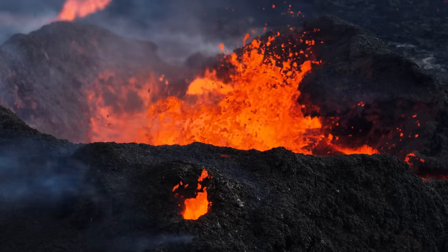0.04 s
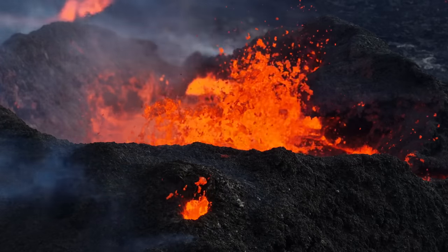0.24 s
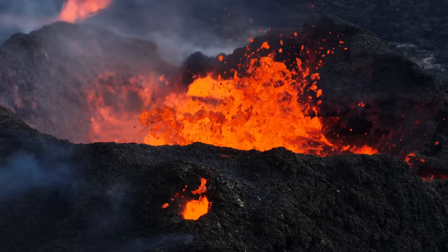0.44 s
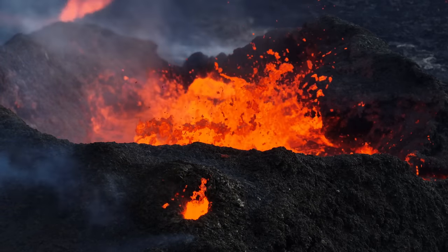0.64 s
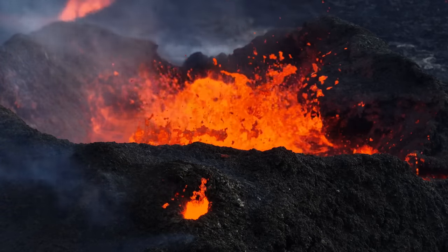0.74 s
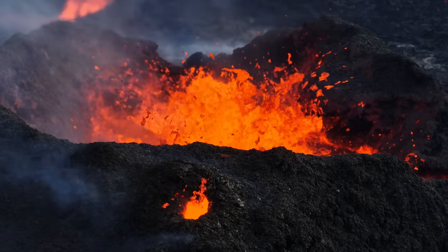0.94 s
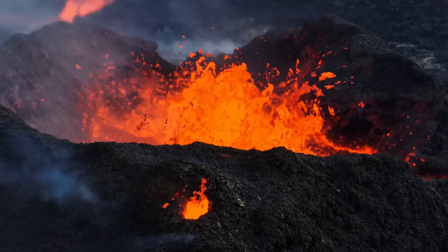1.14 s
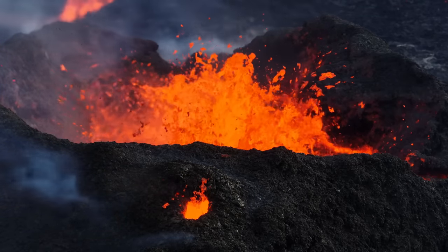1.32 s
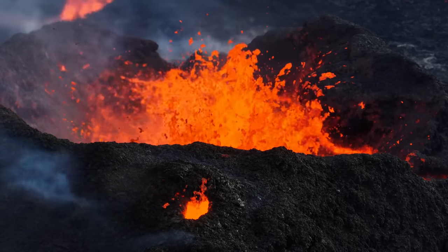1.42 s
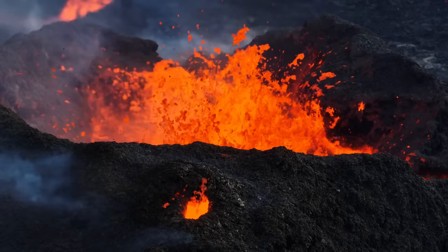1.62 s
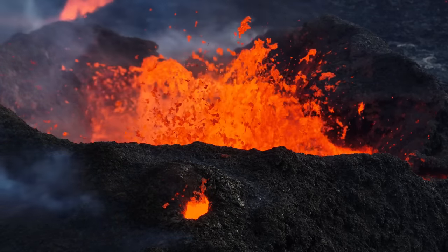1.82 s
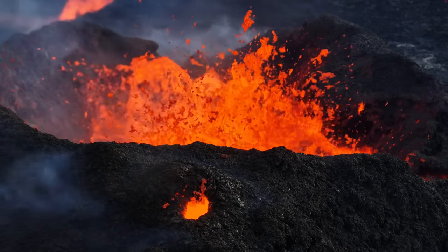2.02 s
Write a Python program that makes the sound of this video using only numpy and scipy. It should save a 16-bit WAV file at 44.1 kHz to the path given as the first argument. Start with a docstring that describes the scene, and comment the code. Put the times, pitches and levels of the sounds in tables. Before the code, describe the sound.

Erupting lava rumbles heavily, splashing and thudding under gritty hiss with small dry cinder ticks

```python
"""Lava fountain at an open fissure.

Deep rumble, churning body, gassy roar and tearing spray swell and sink unevenly left and right: coloured noise
under drawn level curves, with noise slaps and low sine thuds from bursting gas bubbles.
Over them lies a haze of gritty noise hiss; gas spurts once, as bright noise, at the height of the swell.
Small dry ticks of band-passed noise, like cinders landing, sound close by, mostly on the right."""
import sys
import numpy as np
from scipy import signal
from scipy.fft import rfft, irfft
from scipy.io import wavfile

SR = 44100
rng = np.random.default_rng(int(sys.argv[2]) if len(sys.argv) > 2 else 0)


def log_audio(samples):
    """Write samples as a 16-bit WAV file to the path given in sys.argv[1]."""
    # one column per channel
    frames = np.atleast_2d(samples).T
    # limit to full scale, then quantise
    limited = np.clip(frames, -1, 1)
    pcm = np.round(limited * 32767).astype(np.int16)
    wavfile.write(sys.argv[1], SR, pcm)


N = 91022
TIME_S, FREQS_HZ = np.arange(N) / SR, np.fft.rfftfreq(N, 1 / SR)


def amp(db):
    """Decibels to gain."""
    return 10 ** (np.asarray(db) / 20)


def panned(level_db, pan_db):
    """Left and right gain; pan_db is left minus right."""
    return amp([[level_db + pan_db / 2], [level_db - pan_db / 2]])


def unit(x):
    """Scales each channel to rms 1."""
    return x / np.sqrt(np.mean(x ** 2, -1, keepdims=True) + 1e-20)


def coloured(x, colour):
    """Filters x by a spectrum drawn on a log-frequency axis, then scales to rms 1."""
    hz, db = np.transpose(colour)
    gain = amp(np.interp(np.log(FREQS_HZ + 1), np.log(hz), db))
    return unit(irfft(rfft(x) * gain, N))


def levels(curve):
    """Left and right gain over time."""
    s, left_db, right_db = np.transpose(curve)
    return amp([np.interp(TIME_S, s, left_db), np.interp(TIME_S, s, right_db)])


def pair(likeness):
    """White noise in two channels with the given correlation."""
    a, b = rng.standard_normal((2, N))
    return np.array([a, likeness * a + np.sqrt(1 - likeness ** 2) * b])


def flutter(rate_hz, depth_db):
    """Random gain, alike on both sides, wavering mostly below rate_hz with rms depth_db."""
    lowpass = 1 / (1 + (FREQS_HZ / rate_hz) ** 4)
    return amp(depth_db * unit(irfft(rfft(pair(1.0)) * lowpass, N)))


def steadied(x, span_s):
    """Evens out the chance swells of a noise, for a sustained flow."""
    window = signal.windows.hann(int(span_s * SR))[None]
    energy = signal.fftconvolve(x ** 2, window, 'same', axes=1)
    weight = signal.fftconvolve(np.ones_like(x), window, 'same', axes=1)
    return x / np.sqrt(abs(energy / weight) + 1e-9)


# Rumble level. Each row: time in seconds, left and right level in dB before trim.
RUMBLE_LEVELS = [(0, -12.5, -16), (0.05, -18, -26), (0.11, -13, -17.5), (0.2, -22, -16), (0.34, -21, -14),
                 (0.45, -23, -15), (0.53, -20, -13), (0.62, -28, -13), (0.71, -23, -15), (0.77, -24, -15),
                 (0.87, -19.5, -11.5), (1.0, -21, -15), (1.08, -14.5, -11), (1.16, -15.5, -13),
                 (1.32, -18, -13), (1.38, -25, -26), (1.45, -14.5, -18), (1.56, -19.5, -19.5),
                 (1.62, -20.5, -23.5), (1.8, -23.5, -17.5), (1.86, -25, -19.5), (1.95, -24, -18.5),
                 (2.01, -31, -26), (2.06, -14.5, -15.5)]
# Rumble spectrum. Each row: frequency in Hz, relative level in dB.
RUMBLE_SPECTRUM = [(8, -47), (22, -6.5), (33, 2), (48, 4.5), (72, -1), (98, -2.5), (125, -10), (220, -38),
                   (600, -72)]


def rumble(trim_db=0.4, likeness=0.86, span_s=0.09):
    """Deep, sustained pressure noise, nearly the same on both sides."""
    noise = coloured(pair(likeness), RUMBLE_SPECTRUM)
    return amp(trim_db) * levels(RUMBLE_LEVELS) * steadied(noise, span_s)


# Upper-bass level. Each row: time in seconds, left and right level in dB before trim.
BODY_LEVELS = [(0, -12.5, -20), (0.04, -20, -27), (0.08, -19, -23.5), (0.2, -28, -24), (0.29, -23, -22),
               (0.37, -27.5, -22), (0.52, -22, -16.5), (0.62, -30, -20.5), (0.75, -24.5, -17),
               (0.92, -20, -17.5), (1.05, -20, -18.5), (1.25, -21, -23.5), (1.4, -17.5, -19.5),
               (1.52, -21.5, -27), (1.64, -18.5, -21), (1.72, -24, -23.5), (2.06, -30.5, -28.5)]
# Upper-bass spectrum. Each row: frequency in Hz, relative level in dB.
BODY_SPECTRUM = [(50, -10), (95, -6.5), (125, -1), (175, 0.5), (205, -3.5), (250, -2.5), (290, -12),
                 (450, -26), (1500, -73)]


def body(trim_db=0.22, likeness=0.85, span_s=0.081):
    """Churning in the upper bass: steadied noise under a level curve."""
    noise = coloured(pair(likeness), BODY_SPECTRUM)
    return amp(trim_db) * levels(BODY_LEVELS) * steadied(noise, span_s)


# Roar level. Each row: time in seconds, left and right level in dB.
ROAR_LEVELS = [(0,-22.5,-30),(.12,-22,-28),(.2,-28,-30),(.33,-31.5,-30),(.52,-27.5,-25),(.61,-32,-27.5),(.72,-26,-25),(.83,-27,-23.5),(1.05,-25,-25.5),(1.2,-24.5,-24),(1.36,-23.5,-27.5),(1.5,-28.5,-34.5),(1.63,-21,-29),(1.72,-31.5,-33),(1.8,-28.5,-31.5),(1.9,-33.5,-36.5),(2.06,-32.5,-34)]
# Roar spectrum. Each row: frequency in Hz, relative level in dB.
ROAR_SPECTRUM = [(120, -49), (240, -3.5), (330, 2), (480, 0.5), (680, -4.5), (850, -8), (1100, -11.5),
                 (2000, -27.5), (8000, -79)]


def roar(likeness=0.61, span_s=0.087):
    """Turbulent gas, torn by a quick flutter."""
    noise = coloured(pair(likeness), ROAR_SPECTRUM)
    torn = noise * flutter(rate_hz=86, depth_db=0.7)
    return levels(ROAR_LEVELS) * steadied(torn, span_s)


# Spray level. Each row: time in seconds, left and right level in dB.
SPRAY_LEVELS = [(0, -24.5, -32), (0.14, -27.5, -36), (0.19, -37.5, -35), (0.37, -40.5, -33.5),
                (0.52, -38, -28), (0.65, -37, -32.5), (0.72, -34.5, -28.5), (0.9, -33, -31.5),
                (1.0, -26, -28.5), (1.2, -24, -27), (1.26, -27, -31), (1.42, -25.5, -32),
                (1.52, -28.5, -36.9), (1.63, -28.5, -37.5), (1.71, -35, -35), (1.78, -35, -34.5),
                (1.98, -39.5, -39), (2.06, -36, -43)]
# Spray spectrum. Each row: frequency in Hz, relative level in dB.
SPRAY_SPECTRUM = [(400, -13), (750, -2.5), (980, -3), (1420, -5), (1950, -10), (2600, -15), (3500, -20.5),
                  (6000, -35.5), (16000, -74)]
SPLATS_PER_S, SPLAT_DECAY_S, SPLAT_POWER_SHARE = 190, 0.0015, 0.47


def spray(likeness=0.44, span_s=0.11):
    """Lava tearing and splashing: many short, overlapping bursts over a steady rush."""
    sizes = np.minimum(rng.exponential(1, N), 2)
    hits = sizes * (rng.random(N) < SPLATS_PER_S / SR)
    bursts = signal.lfilter([1], [1, -np.exp(-1 / (SPLAT_DECAY_S * SR))], hits)
    power = 1 - SPLAT_POWER_SHARE + SPLAT_POWER_SHARE * bursts / bursts.mean()
    splashes = pair(likeness) * np.sqrt(power)
    return levels(SPRAY_LEVELS) * steadied(coloured(splashes, SPRAY_SPECTRUM), span_s)


# Hiss level. Each row: time in seconds, left and right level in dB before trim.
HISS_LEVELS = [(0, -31, -33), (0.13, -36.5, -33), (0.2, -40, -33), (0.37, -42, -34.5), (0.63, -40.5, -32.5),
               (0.73, -39, -31), (0.9, -41, -33), (1.0, -37.5, -31.5), (1.19, -38, -32.5),
               (1.27, -37.5, -34), (1.42, -36, -34.5), (1.62, -40, -35.5), (1.72, -41, -36.5),
               (1.92, -42.5, -38.5), (2.06, -44, -36.5)]
# Hiss spectra, left and right. Each row: frequency in Hz, relative level in dB.
LEFT_HISS_SPECTRUM = [(500, -19), (1500, 1.5), (2800, 0.5), (3700, -2.5), (4700, -3), (6000, -8),
                      (8000, -11), (11000, -16.5), (15800, -25)]
RIGHT_HISS_SPECTRUM = [(500, -60), (1500, 2), (2800, 0.5), (3700, -1), (4650, 0.5), (6000, -4.5),
                       (8000, -6.5), (11000, -12), (15800, -19)]
GRIT_PER_S, GRIT_DB, GRIT_SPREAD_DB = 410, -7.5, 1.5  # GRIT_DB: before colouring


def hiss(trim_db=0.48, likeness=0.012):
    """A haze of fluttering noise with fine grit: sparse random clicks of either sign."""
    sizes = amp(GRIT_SPREAD_DB * np.minimum(rng.exponential(1, (2, N)), 4))
    signs = rng.choice([-1, 1], (2, N))
    grit = unit(sizes * signs * (rng.random((2, N)) < GRIT_PER_S / SR))
    haze = pair(likeness) * flutter(rate_hz=230, depth_db=1.07)
    left, right = haze + amp(GRIT_DB) * grit
    sides = np.array([coloured(left, LEFT_HISS_SPECTRUM), coloured(right, RIGHT_HISS_SPECTRUM)])
    return amp(trim_db) * levels(HISS_LEVELS) * sides


# Louder lava slaps. Each row: start in seconds, peak envelope level in dB, left minus right in dB.
SLAP_EVENTS = [(0.048, -30.5, 10), (.131, -29, 4), (.247, -31, 3), (.463, -39, -2), (.497, -31, -7),
               (.514, -30.5, -3), (0.721, -25, -10), (0.873, -24.5, -11), (0.955, -20.5, -1),
               (1.015, -24, -5), (1.065, -24.5, 9), (1.186, -25, -2), (1.211, -22, 1), (1.333, -24.5, 6),
               (1.464, -29, 12), (1.616, -40, 9), (1.759, -33, -4)]
# Slap spectrum. Each row: frequency in Hz, relative level in dB.
SLAP_SPECTRUM = [(200, -36), (450, 3.5), (850, 6.5), (1400, -11), (2300, -12.5), (4000, -14.5),
                 (12000, -51)]
SLAP_RISE_S = 0.0038


def slaps(likeness=0.63):
    """Wet slaps: noise flares up and dies within the roar."""
    gain = np.zeros((2, N))
    for start_s, db, pan_db in SLAP_EVENTS:
        age = np.maximum(TIME_S - start_s, 0) / SLAP_RISE_S
        gain += panned(db, pan_db) * age * np.exp(1 - age)  # peaks at age 1
    return gain * coloured(pair(likeness), SLAP_SPECTRUM)


# Bursting gas bubbles. Each row: centre in seconds, peak envelope level in dB before trim, pitch at centre
# in Hz, glide in Hz per s, time from centre to 1/e in seconds, left minus right in dB.
THUD_EVENTS = [(.152, -17, 215, 0, 0.0072, 2), (.257, -27, 144, 0, 0.01, -2),
               (.298, -16, 133, 2500, 0.012, -7), (.455, -11.5, 67, 0, 0.031, -11),
               (.534, -12.5, 171, 0, 0.0089, -2), (.67, -10, 63, 0, 0.014, -9),
               (.725, -13.5, 90, -1000, 0.03, -6), (.895, -17, 61, -500, 0.014, -6),
               (.955, -10.5, 82.7, -400, 0.037, -7), (1.012, -10, 140, 3000, 0.033, 1),
               (1.07, -26, 56.3, 0, 0.053, 4), (1.14, -11, 61, 0, 0.016, 0),
               (1.195, -11.5, 155, 1500, 0.018, 1), (1.228, -6.5, 80, 0, 0.013, 3),
               (1.286, -15, 138, -1500, 0.017, 5), (1.322, -9.5, 84, -1200, 0.026, 1),
               (1.402, -16, 158, -3000, .018, 6.5), (1.456, -10.5, 71, 0, 0.031, -3),
               (1.564, -9, 54.6, 0, 0.024, 2), (1.645, -14.5, 223, 0, 0.007, 7),
               (1.664, -12.5, 86, -600, .018, 2.5), (1.868, -15.5, 59, 0, 0.01, -4)]


def thuds(trim_db=-1):
    """Each bursting bubble pushes out a few low swings of air; some glide as it swells or shrinks."""
    out = np.zeros((2, N))
    phases_turns = rng.random(len(THUD_EVENTS))
    for (centre_s, db, hz, glide, half_s, pan_db), turn in zip(THUD_EVENTS, phases_turns):
        age_s = TIME_S - centre_s
        turns = hz * age_s + glide * age_s ** 2 / 2 + turn
        swing = np.exp(-(age_s / half_s) ** 2) * np.sin(2 * np.pi * turns)
        out += panned(db, pan_db) * swing
    return amp(trim_db) * out


# Cinder ticks. Each row: start in seconds, level in dB before envelope and halving, centre in Hz,
# width from centre to half gain in octaves, decay in seconds, left minus right in dB.
TICK_EVENTS = [(0.248, -21.5, 5000, 0.65, .00081, 3), (.435, -23, 13000, .35, .0007, 1),
               (.657, -11.5, 11000, 0.28, 0.00099, -6), (.767, -28, 8000, .6, .0004, -2),
               (.9477, -25, 11900, .56, .0005, -9), (1.65, -25.5, 7000, 1.0, 0.002, -10),
               (1.694, -19.5, 4700, 0.34, 0.00081, -14.5), (1.7298, -29, 7000, .35, .0004, -3),
               (1.772, -21.5, 6000, 0.92, .0006, -8), (1.777, -22, 5700, 0.41, .00047, -12),
               (1.793, -15.5, 3600, 0.48, 0.00045, -10)]
TICK_RISE_S, TICK_TAIL_DB, TICK_TAIL_S = 0.0003, -20, 0.0043
TICK_TOP_HZ, TICK_FLOOR_DB = 14900, -26


def ticks(size=2048):
    """Each cinder makes a brief, dry crunch of band-passed noise with a faint tail."""
    out = np.zeros((2, N + size))
    t, hz = np.arange(size) / SR, np.fft.rfftfreq(size, 1 / SR)
    rise = np.minimum(t / TICK_RISE_S, 1)
    tail = amp(TICK_TAIL_DB) * np.exp(-t / TICK_TAIL_S)
    for start_s, db, centre_hz, octaves, decay_s, pan_db in TICK_EVENTS:
        fall = np.exp(-np.maximum(t - TICK_RISE_S, 0) / decay_s) + tail
        peak = 1 / (1 + (np.log2((hz + 1) / centre_hz) / octaves) ** 2)
        band = (peak + amp(TICK_FLOOR_DB)) / (1 + (hz / TICK_TOP_HZ) ** 12)
        noise = unit(irfft(rfft(rng.standard_normal((2, size))) * band))
        start = round(start_s * SR)
        out[:, start:start + size] += panned(db, pan_db) * rise * fall * noise / 2
    return out[:, :N]


# Gas spurt spectrum. Each row: frequency in Hz, relative level in dB.
SPURT_SPECTRUM = [(1500, -27), (3200, -13), (4200, 3), (5200, 0), (6200, -12), (9000, -13), (15000, -28)]
SPURT_PEAK_S, SPURT_RISE_S, SPURT_FALL_S = 1.187, 0.045, 0.023


def spurt(level_db=-35, likeness=0.5):
    """A bright hiss of escaping gas builds up and breaks off."""
    age_s = TIME_S - SPURT_PEAK_S
    swell = np.exp(-np.maximum(-age_s / SPURT_RISE_S, age_s / SPURT_FALL_S))
    return amp(level_db) * swell * coloured(pair(likeness), SPURT_SPECTRUM)


def scene():
    """All layers together."""
    return rumble() + body() + roar() + spray() + hiss() + slaps() + thuds() + ticks() + spurt()


CEILING, EDGE_HZ = 0.8, 15950


def record(dry):
    """The recorder rounds off the highest peaks and limits the band."""
    rounded = dry / (1 + (dry / CEILING) ** 8) ** (1 / 8)
    lowpass = signal.firwin(701, EDGE_HZ, window=("kaiser", 9), fs=SR)
    return signal.oaconvolve(rounded, lowpass[None], "same")


dry = scene()
out = record(dry)
log_audio(out)
```